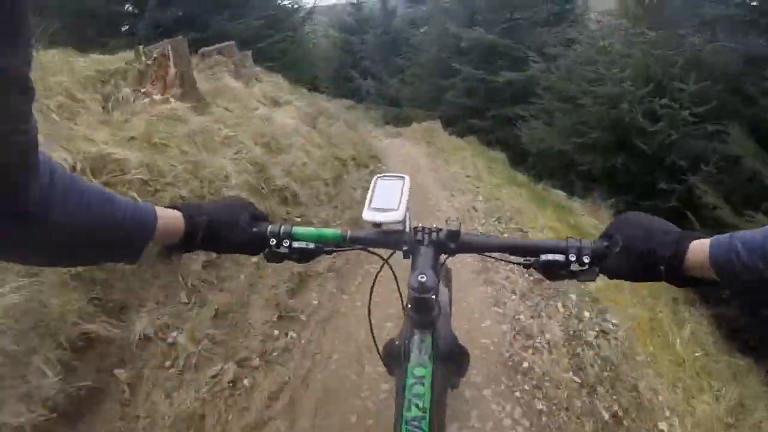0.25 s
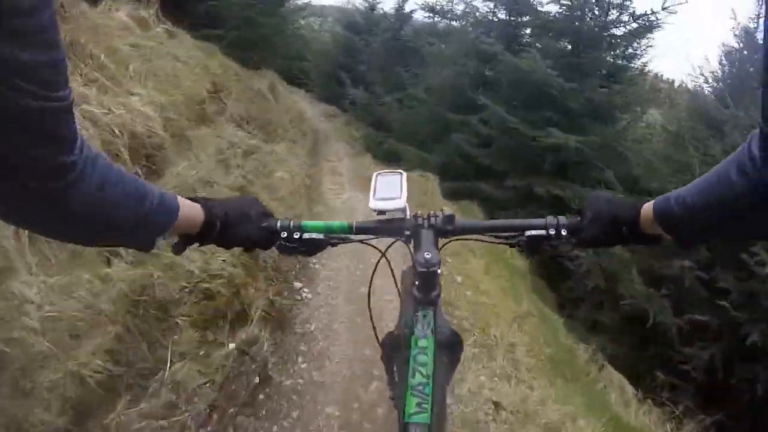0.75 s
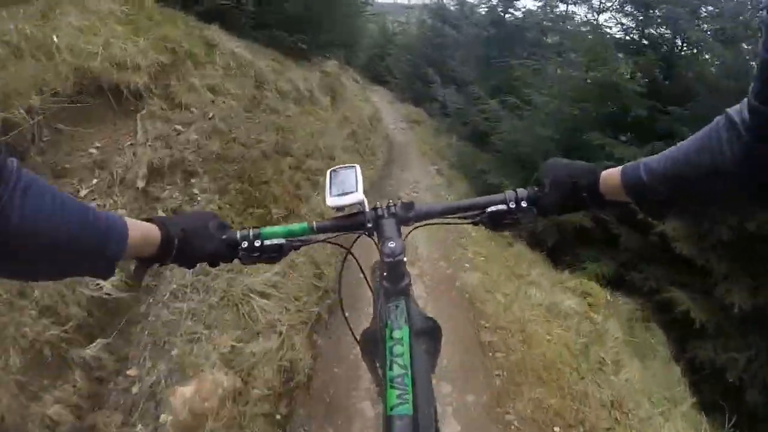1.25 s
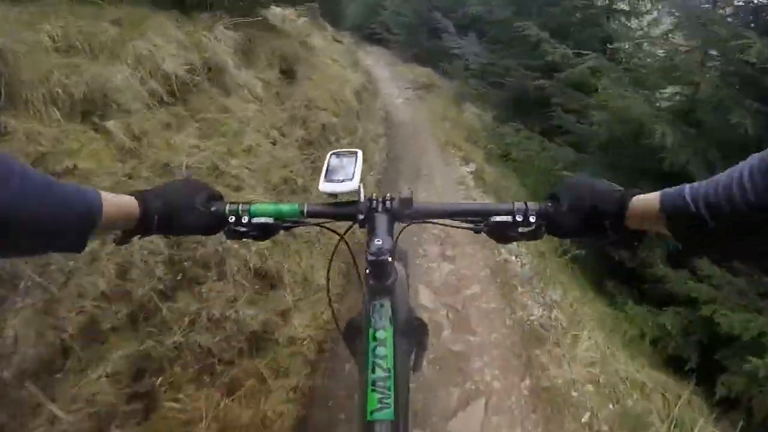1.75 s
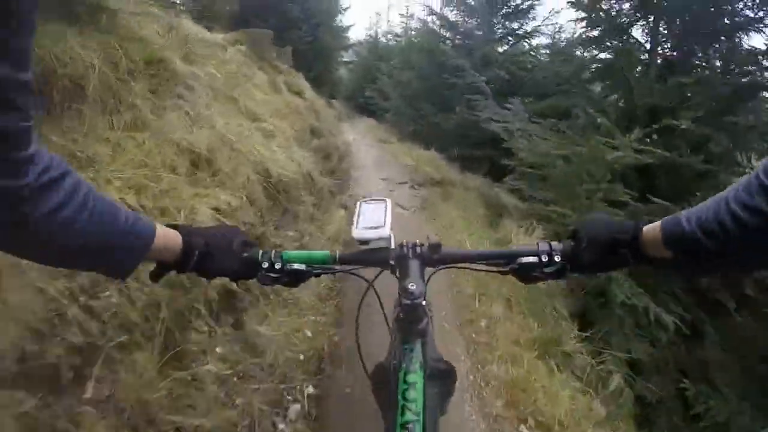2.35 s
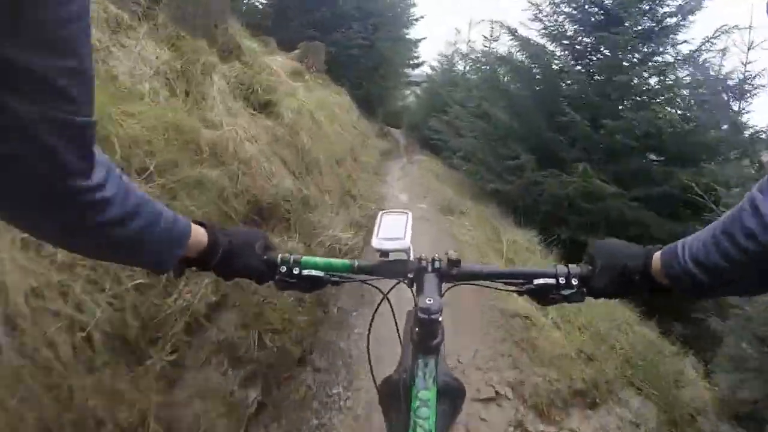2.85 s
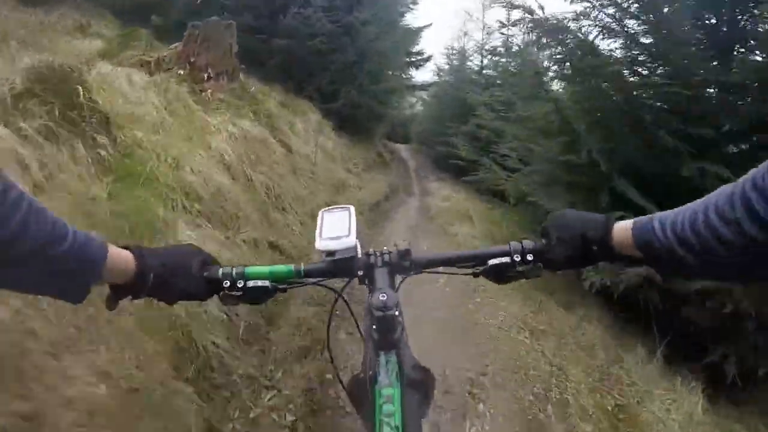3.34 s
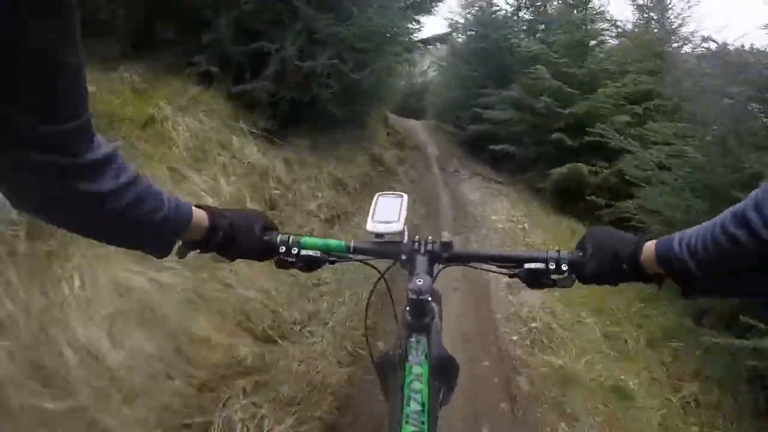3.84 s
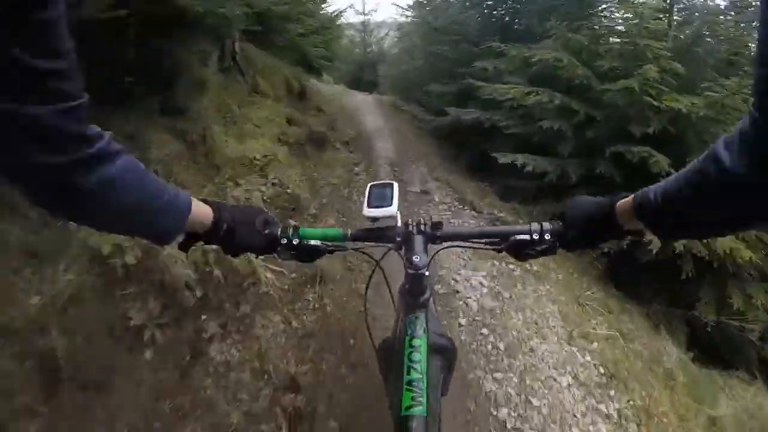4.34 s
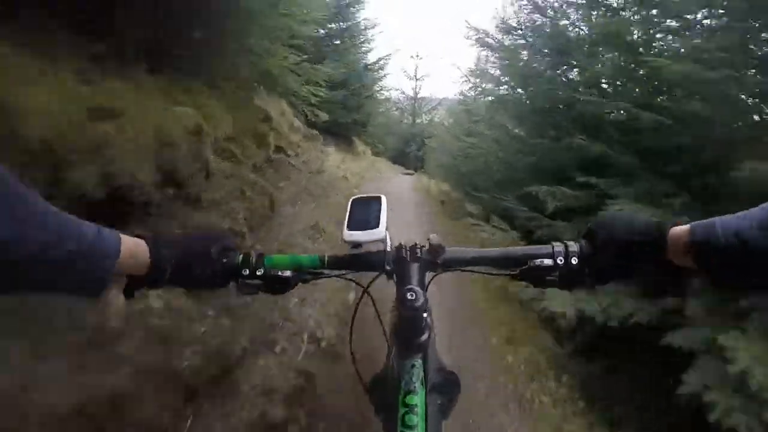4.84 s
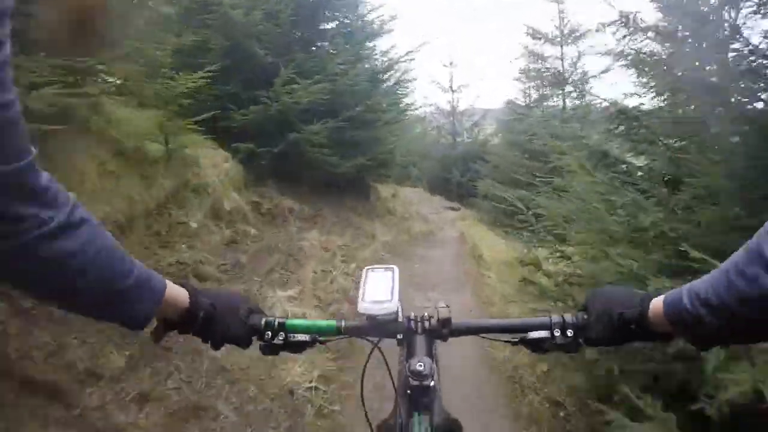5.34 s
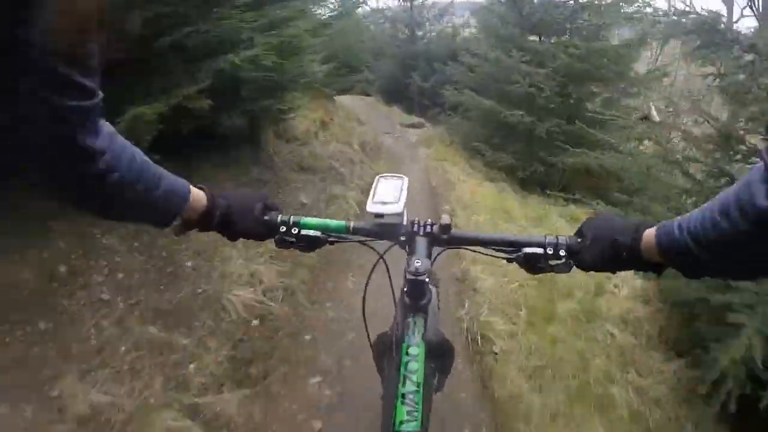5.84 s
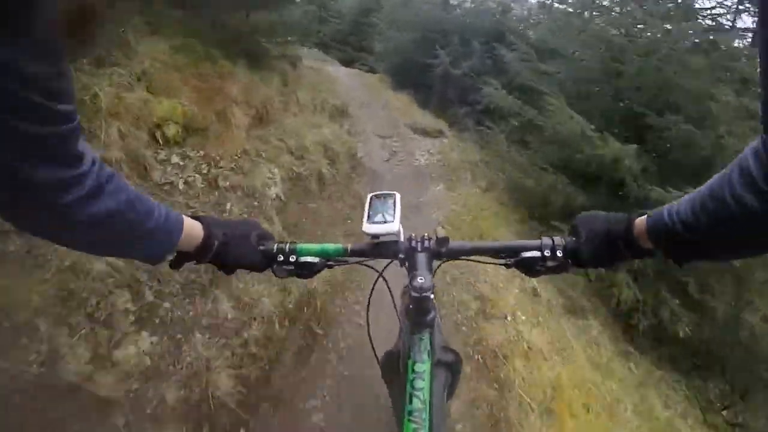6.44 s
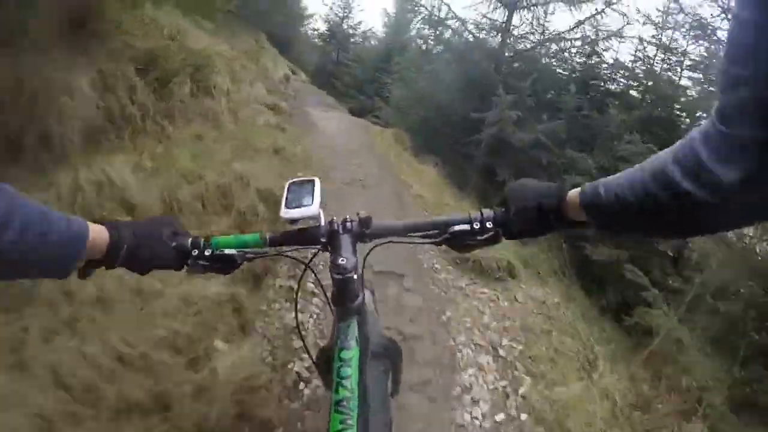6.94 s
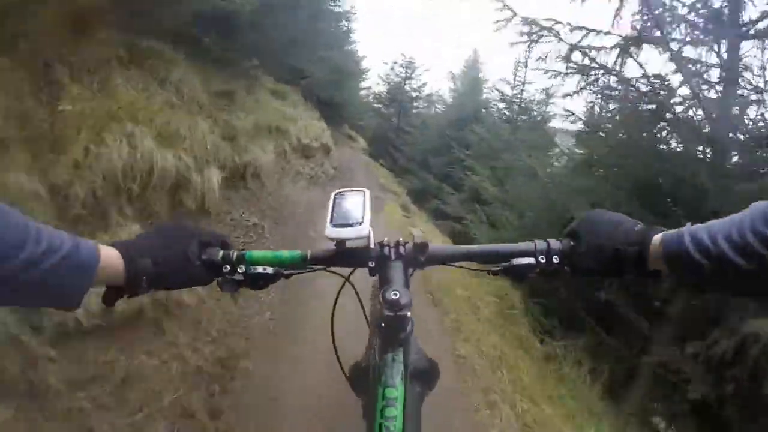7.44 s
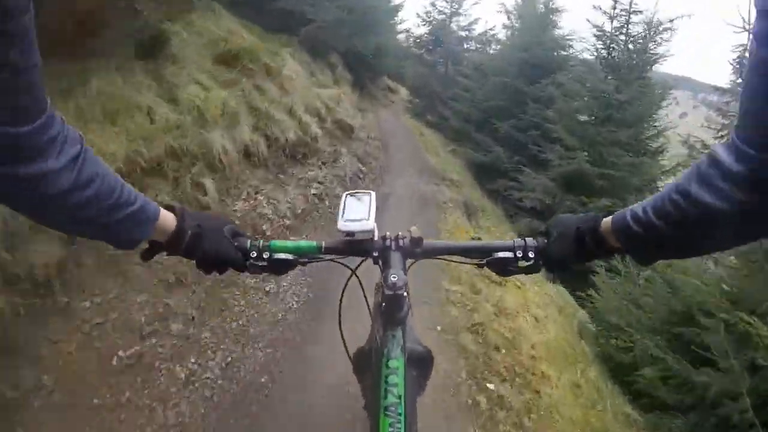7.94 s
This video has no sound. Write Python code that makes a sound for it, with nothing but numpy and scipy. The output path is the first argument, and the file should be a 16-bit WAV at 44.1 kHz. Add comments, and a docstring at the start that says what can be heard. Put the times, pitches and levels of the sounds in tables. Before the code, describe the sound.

A bicycle descends a stony forest path, heard by a microphone enclosed in a hard shell on the rider's chest. Loose parts click and clatter irregularly over low rumble and faint gravel crunch. Deep thumps crowd together around two seconds, return near four and a half, and one big jolt lands just after seven. Brief gritty tyre skids scratch around three seconds. Everything is close, muffled and boxy.

```python
"""Stony trail by bicycle, heard inside a shell

A bicycle runs down a stony trail, heard by a microphone shut in a hard shell on the rider's chest.
Filtered noise makes wind, shake, air and gravel; damped swings make the jolts that thump the shell.
Impulses and noise make loose parts rattle, soft blows make dull knocks, dense grit makes tyre skids.
Rattles, gravel and skids ring the shell's resonances; gravel and knocks also ring a cavity.
"""
import sys
import numpy as np
from scipy import signal
from scipy.fft import rfft, irfft
from scipy.io import wavfile

SR = 44100
rng = np.random.default_rng(int(sys.argv[2]) if len(sys.argv) > 2 else 0)


def waveform_to_disk(signal):
    """Save audio, clipped to [-1, 1], as 16-bit WAV at the path in sys.argv[1]."""
    frames = np.transpose(np.atleast_2d(signal))
    scaled = np.clip(frames, -1, 1) * 32767
    samples = np.round(scaled).astype(np.int16)
    wavfile.write(sys.argv[1], SR, samples)


N = 361179  # samples


def amp(db):
    """Decibel law: 20 dB is a factor of ten in amplitude."""
    return 10 ** (np.asarray(db) / 20)


def evened(x):
    """Normalisation to a root-mean-square level of 1."""
    return x / np.sqrt(np.mean(x ** 2) + 1e-20)


def add(mix, s, sound):
    """Superposition: add a sound to the mix from s seconds on."""
    part = mix[max(round(s * SR), 0):][:len(sound)]
    part += sound[:len(part)]


def soften(x, hz):
    """Contact compliance: a softer contact gives the same blows with less treble."""
    low_pass = signal.butter(2, min(hz, SR / 2.5), fs=SR, output="sos")
    return signal.sosfilt(low_pass, x)


def ring(x, hz, width_hz):
    """Damped resonance: a pole pair with a gain of about 1 at its centre."""
    r = np.exp(-np.pi * width_hz / SR)
    return signal.lfilter([1 - r, 0, r - 1], [1, -2 * r * np.cos(2 * np.pi * hz / SR), r * r], x)


def shell(x, modes):
    """Modal superposition: resonances of alternating sign, scaled so that white noise keeps its level."""
    tick = np.eye(1, 2048)[0]
    answer = np.zeros(len(tick))
    for k, (hz, width_hz, db) in enumerate(modes):
        answer += (-1) ** k * amp(db) * ring(tick, hz, width_hz)
    return signal.oaconvolve(x, answer / np.linalg.norm(answer))[:N]


def coloured(spectrum):
    """Spectral shaping: white noise weighted along log frequency, at level 1."""
    hz, db = np.transpose(spectrum)
    f = np.fft.rfftfreq(N, 1 / SR)
    weight = amp(np.interp(np.log(f + 1), np.log(hz), db))
    return evened(irfft(rfft(rng.standard_normal(N)) * weight, N))


def lumps(cutoff_hz, depth_db):
    """Amplitude modulation: a gain of level 1 that wanders at random below the cutoff."""
    low_pass = signal.butter(2, cutoff_hz, fs=SR, output="sos")
    slow = signal.sosfilt(low_pass, rng.standard_normal(N))
    return evened(amp(depth_db * evened(slow)))


def grit(per_s, spread_db):
    """Random impulse train: sparse ticks of random sign, a few of them large, at level 1."""
    size = amp(spread_db * np.minimum(rng.exponential(1, N), 4))
    sign = rng.choice([-1., 1.], N)
    return evened(size * sign * (rng.random(N) < per_s / SR))


# Course of the ride. Each row: time in seconds, relative levels of wind, gravel crunch and
# gravel hiss in dB.
RIDE = [(0.0, -38.5, -54.5, -72), (0.26, -38, -57.5, -75), (0.46, -32.5, -47, -66), (0.7, -42, -54, -72),
        (1.2, -38.5, -52.5, -72), (1.6, -34, -52.5, -70), (2.2, -25.5, -42, -62), (2.5, -42, -57.5, -90),
        (2.85, -42, -55, -85), (3.1, -31.5, -47, -63), (3.4, -39, -51.5, -72), (3.75, -34, -51, -65),
        (4.3, -40, -52.5, -76), (4.62, -31, -47, -77), (4.85, -37, -51.5, -87), (5.5, -42, -57, -95),
        (6.0, -37.5, -55.5, -67), (6.6, -38.5, -50.5, -91), (7.16, -26.5, -48.5, -81), (7.4, -34, -46, -78),
        (8.19, -48, -66.5, -83)]


def ride_db(axis):
    """Linear interpolation in decibels: one column of the ride at every sample."""
    rows = np.transpose(RIDE)
    return np.interp(np.arange(N) / SR, rows[0], rows[axis])


# Spectra of wind, frame shake and air. Each row: frequency in Hz, relative spectral level in dB.
WIND_SPECTRUM = [(6, -32), (12, 5.5), (36, -13), (70, -22), (150, -25), (400, -82), (3000, -130)]
SHAKE_SPECTRUM = [(40, -43), (100, 3), (250, -2.5), (570, -11), (1000, -31), (1400, -3), (3000, -52),
                  (9500, -61), (12500, -95)]
AIR_SPECTRUM = [(600, 17.5), (1500, 9.5), (3200, -29), (3650, -39), (4100, -16), (4600, -37), (6000, -8),
                (9000, -3), (12500, -31), (16000, -60)]
AIR_DB = -62
WIND_REF_DB = -38
SHAKE_DB, SHAKE_PER_DB = -49.5, 0.92  # shake level at the wind reference, dB per dB of wind


def rumble():
    """Modulated noise: wind buffets the shell, the frame shakes in lumps, a faint rush of air is steady."""
    wind_db = ride_db(axis=1)
    wind = coloured(WIND_SPECTRUM) * lumps(4.7, 1.2) * amp(wind_db)
    shake_db = SHAKE_DB + SHAKE_PER_DB * (wind_db - WIND_REF_DB)
    shake = coloured(SHAKE_SPECTRUM) * lumps(21.4, 6.64) * amp(shake_db)
    air = amp(AIR_DB) * coloured(AIR_SPECTRUM)
    return wind + shake + air


# Cavity resonance: frequency in Hz, width in Hz under gravel.
CAVITY = (1560, 91)
# Shell resonances, middle and treble. Each row: frequency in Hz, width in Hz, relative level in dB.
SHELL_MIDDLE = [(1400, 880, 2.5), (2165, 263, 11.5), (2543, 208, 11), (3134, 217, 11), (4000, 75, -3)]
SHELL_TREBLE = [(4100, 360, 3), (5805, 605, 5), (7870, 1050, -1), (9420, 920, -5), (12900, 1100, -21),
                (6950, 2200, -17.5)]
CRUNCH_REF_DB = -54
DRONE_DB, DRONE_PER_DB = -52.5, 0.42  # drone level at the crunch reference, dB per dB of crunch


def gravel():
    """Random excitation: clumped grit under the tyres drives cavity and shell; finer grit hisses."""
    crunch_db = ride_db(axis=2)
    drive = lumps(40, 3.0) * (.6 * grit(2500, 3.5) + .7 * rng.standard_normal(N))
    roll = .5 * drive + .8 * rng.standard_normal(N) * lumps(40, 2.0)
    drone_gain = amp(DRONE_DB + DRONE_PER_DB * (crunch_db - CRUNCH_REF_DB))
    drone = evened(ring(roll, *CAVITY)) * drone_gain
    crunch = shell(evened(soften(drive, 1980)) * amp(crunch_db - 7.5), SHELL_MIDDLE)
    fine = lumps(25, 2.5) * amp(ride_db(axis=3)) * grit(5000, 2.5)
    hiss = soften(shell(fine, SHELL_TREBLE), 10500)
    return drone + crunch + hiss


# Jolts. Each row: start in seconds, relative level in dB, settled pitch in Hz,
# direction (+1 push, -1 pull).
JOLTS = [(0.126, -29.5, 65, 1), (0.269, -32, 151, -1), (0.4063, -30, 54, 1), (0.4508, -32, 100, -1),
         (1.2387, -26.5, 126, -1), (1.253, -26, 130, 1), (1.2796, -25.5, 133, 1), (1.43, -20.5, 93, 1),
         (1.571, -21.5, 101, -1), (1.629, -28, 66, -1), (1.6388, -11, 111, 1), (1.6472, -25, 55, -1),
         (1.7926, -13, 78.4, 1), (1.8234, -26.5, 105, -1), (1.9162, -10, 96, 1), (1.9313, -12.5, 150, -1),
         (1.9476, -16.5, 95, 1), (2.0512, -17.5, 170, -1), (2.06, -5.5, 130, 1), (2.1943, -7.5, 101, 1),
         (2.208, -23, 45, 1), (2.33, -6, 137, 1), (2.5668, -32.5, 126, 1), (4.057, -31, 115, 1),
         (4.5, -21, 59.6, -1), (4.522, -18, 124, 1), (4.5872, -15, 75.4, 1), (4.735, -25, 153, -1),
         (4.7594, -6, 121, 1), (5.051, -29, 123, 1), (5.059, -26.5, 44, -1), (5.0786, -30.5, 111, 1),
         (5.8236, -33.5, 95, 1), (5.8782, -34, 78, 1), (5.95, -29.5, 42.2, -1), (6.016, -33, 44.7, 1),
         (6.0497, -28.5, 175, 1), (6.1917, -27.5, 155, -1), (6.1971, -23, 81, 1), (6.339, -25, 117, -1),
         (6.7502, -21.5, 77, 1), (6.8501, -23.5, 102, -1), (7.2436, -5, 116, 1), (7.69, -30.5, 142, 1),
         (7.8601, -34, 94, 1)]


def jolts():
    """Transient oscillation: a quick swing and a slower one back; the mount shudders on for a moment."""
    out, after = np.zeros(N), np.zeros(N)
    for s, db, hz, way in JOLTS:
        turns = hz * np.arange(int(2.2 * SR / hz)) / SR  # cycles at the settled pitch
        phase = turns + 0.11 * (1 - np.exp(-turns / 0.13))  # runs ahead at first
        envelope = (turns / 0.24 * np.exp(1 - turns / 0.31)) ** 2.14
        add(out, s, np.sign(way) * amp(db) * envelope * np.sin(2 * np.pi * phase))
        t = np.arange(4000) / SR / 0.0062  # in units of 6.2 ms
        add(after, s, amp(db) * t * np.exp(-t))
    shudder = after * evened(ring(rng.standard_normal(N), 190, 112))
    return out + amp(-19.0) * shudder


# Rattles of loose parts. Each row: start in seconds, relative level in dB, contact length in ms,
# relative treble against middle in dB.
RATTLES = [(0.1381, -34.5, 2.4, -10), (0.146, -23, 1.7, -6), (0.2304, -32, 3.7, -0.5),
           (0.3283, -26, 1.6, -8.5), (0.356, -26.5, 3.3, -1), (0.439, -38, 1.8, -25),
           (0.472, -35, 5.8, -4.5), (0.6342, -34.5, 1.7, -8), (0.641, -34.5, 2, -7),
           (0.6748, -34.5, 1.7, -5.5), (0.575, -46.5, 8.8, -0.5), (0.852, -39.5, 1.1, -13),
           (0.9106, -30, 3.2, -3.5), (1.119, -27, 1.35, -7.5), (1.17, -31.5, 3.7, -2.5),
           (1.28, -26.5, 2.2, -42), (1.3011, -22, 1.5, -7), (1.375, -27.5, 7.2, -3.5),
           (1.5098, -22.5, 1.55, -8.5), (1.577, -29, 3.4, 2.5), (1.637, -19, 2.9, -59),
           (1.6711, -23, 1.5, -7), (1.7, -33, 1.1, -31), (1.721, -26.5, 4.1, -7.5), (1.8, -25, 1.63, 0),
           (1.8602, -27.5, 2, 0), (1.9138, -32.5, 4.4, 0), (1.9333, -32.5, 6.2, -5),
           (1.9505, -17.5, 1.6, -15), (1.96, -35, 5.1, -1), (1.9936, -29.5, 3, -1.5),
           (2.0516, -35, 5.7, -3), (2.063, -30, 1.1, -3.5), (2.0818, -32.5, 2.7, -3),
           (2.1235, -36, 1.7, 9.5), (2.1476, -13.5, 1.6, -45), (2.1984, -38.5, 0.76, 1.5),
           (2.204, -31.5, 2.3, 0), (2.2301, -25, 0.67, -21), (2.277, -20.5, 1.1, -37), (2.287, -29, 2, 4.5),
           (2.3321, -25.5, 1.2, -15), (2.3417, -37.5, 8.2, 0.5), (2.4238, -38.5, 2.8, -10),
           (2.4705, -38, 2.6, -9.5), (2.5574, -39.5, 4.9, -4.5), (2.5685, -35.5, 2.8, -40),
           (2.701, -40, 1.6, -8), (2.761, -41, 3.3, -6.5), (2.8881, -40, 2, -8.5), (2.9438, -34, 7.8, -14),
           (2.9592, -27.5, 1.5, -19), (2.9953, -35.5, 2, -6), (3.076, -20, 2, -8.5), (3.13, -26, 3.2, -0.5),
           (3.278, -34.5, 1.6, -12), (3.313, -31, 5.6, -1), (3.4081, -29.5, 1.3, -9),
           (3.4427, -32, 4.5, -2.5), (3.5284, -28, 7.8, -12), (3.545, -32.5, 9.6, -20), (3.595, -30, 3, -2),
           (3.6978, -30.5, 2.1, -2.5), (3.7043, -21.5, 1.9, -7), (3.7229, -37, 4.5, -7),
           (3.7315, -29, 2.8, -13), (3.7578, -38, 12, -30), (3.772, -26.5, 5, -3), (3.8793, -33.5, 1.9, -9),
           (3.9651, -34, 9.5, -8.5), (4.0735, -24, 1.7, -8.5), (4.1743, -31.5, 1.4, -12.5),
           (4.2066, -37.5, 5.2, -5), (4.216, -40.5, 1.4, 3.5), (4.464, -32.5, 2.8, -11),
           (4.4684, -28, 1.1, -5.5), (4.4893, -34, 2, -10), (4.5237, -16.5, 2.5, -11.5),
           (4.589, -34, 2.8, -11), (4.6054, -14.5, 2.4, -7), (4.635, -51, 1.2, 7), (4.6741, -33, 2.1, -7),
           (4.6823, -30, 3.2, -2.5), (4.6965, -34, 1.2, -11), (4.7637, -27, 2.7, -6),
           (4.829, -32, 4.5, -3.5), (4.867, -46.5, 5.9, -2.5), (4.911, -47, 1.7, 0),
           (4.921, -32.5, 1.2, -29), (4.974, -31.5, 1.9, -13), (4.9997, -33.5, 2.1, -5.5),
           (5.0665, -24, 1.37, -11), (5.134, -29.5, 1.8, -9.5), (5.148, -39, 4.4, -8),
           (5.234, -35.5, 2.4, -10), (5.245, -36.5, 0.58, -14.5), (5.365, -33, 3.9, -5),
           (5.4121, -30.5, 2, -12), (5.535, -33.5, 2.2, -3), (5.6045, -26.5, 1.44, -7),
           (5.775, -31.5, 2.9, -3.5), (5.8785, -31, 2, -12), (5.9672, -29, 4.4, -2.5),
           (6.0704, -25.5, 1.2, -6), (6.08, -33, 1.5, -13), (6.135, -38, 1.7, -9),
           (6.1657, -25.5, 4.6, -4.5), (6.2916, -40.5, 2.6, -4), (6.313, -40, 2, -5), (6.33, -34, 1.5, -15),
           (6.3985, -27, 3.2, -3), (6.5235, -35.5, 1.3, -3), (6.5297, -26.5, 1.7, -5.5),
           (6.6057, -28.5, 2.8, -2), (6.7643, -38.5, 11, -8.5), (6.8335, -28.5, 3.8, 1.5),
           (6.9168, -26, 1.3, -8), (7.0139, -28, 4, -4), (7.097, -34, 2, -37), (7.1449, -18.5, 2, -9),
           (7.1504, -23, 2.6, -9), (7.1745, -35, 4.5, -5), (7.1887, -24, 3.2, -2.5), (7.2107, -29, 2, -28),
           (7.2476, -22, 3.2, -5), (7.2968, -36.5, 3.1, -3), (7.3202, -25.5, 1.2, -33),
           (7.3824, -27.5, 2.2, -6), (7.445, -30, 3.7, -0.5), (7.5784, -27, 1.6, -8.5),
           (7.6089, -30, 1.3, -8), (7.6344, -34, 2.1, -5.5), (7.69, -29.5, 1.9, -60), (7.7571, -34, 3.8, 0),
           (7.927, -31, 1.7, -11), (8.02, -39.5, 2.2, -10.5)]
# faint rattles at random moments: level above the gravel crunch, spread either way, mean length and treble
FAINT_PER_S, FAINT_DB, FAINT_SPREAD_DB, FAINT_MS, FAINT_TREBLE_DB = 6, 8, 1.5, 8.1, -11
# bounce: delay and its scatter, level change, further change per ms of contact, length, treble change
BOUNCE_MS, BOUNCE_SCATTER_MS, BOUNCE_DB, BOUNCE_DB_PER_MS = 7.5, 0.9, -3.5, -2.5
BOUNCE_LENGTH_MS, BOUNCE_DULL_DB = 1.5, -7.5


def all_rattles():
    """Rebound: listed and faint random rattles each bounce once, duller, strongest for short contacts."""
    u = rng.random((round(FAINT_PER_S * N / SR), 4))
    at = u[:, 0] * (N - 1)
    faint_db = ride_db(axis=2)[at.astype(int)] + FAINT_DB + FAINT_SPREAD_DB * (2 * u[:, 1] - 1)
    faint = np.c_[at / SR, faint_db, FAINT_MS * (.5 + u[:, 2]), 2 * FAINT_TREBLE_DB * u[:, 3]]
    s, db, ms, treble_db = np.r_[faint, RATTLES].T
    late_ms = BOUNCE_MS + BOUNCE_SCATTER_MS * rng.uniform(-1, 1, len(s))
    bounce_db = db + BOUNCE_DB + BOUNCE_DB_PER_MS * ms
    bounce_length = np.full(len(s), BOUNCE_LENGTH_MS)
    bounces = np.c_[s + late_ms / 1000, bounce_db, bounce_length, treble_db + BOUNCE_DULL_DB]
    return np.r_[np.c_[s, db, ms, treble_db], bounces]


def rattles():
    """Impact excitation: a clean blow, chatter for the length of the contact, then a weak shiver."""
    middle, treble, blows = np.zeros(N), np.zeros(N), np.zeros(N)
    ms = np.arange(-300, 1300) / SR * 1000
    rows = all_rattles()
    shape = (len(rows), len(ms))
    chatter = 0.63 * rng.standard_normal(shape) + 0.58 * np.resize(grit(1500, 0.49), shape)
    for (s, db, length, treble_db), noise in zip(rows, chatter):
        length = max(length, .3)
        start = s + ms[0] / 1000
        contact = np.exp(-(abs(ms - 0.33 * length) / (0.99 * length)) ** 1.23)
        shiver = 0.33 * (ms > 0) * np.exp(-abs(ms) / 8)
        # short, hard contacts are mostly one blow
        blow = 16.34 / length * amp(0.032 * (db + 3)) * (ms == 0)
        drive = blow + noise * (contact + shiver)
        add(middle, start, amp(db) * soften(drive, 2000 + 5000 * amp(.5 * treble_db)))
        add(treble, start, amp(db + treble_db) * (drive - 0.076 * blow))
        add(blows, start, amp(db + .5 * treble_db) * blow)
    push = amp(13.0) * soften(blows, 1050)  # each blow also pushes the microphone directly
    ringing = shell(middle, SHELL_MIDDLE) + amp(-1.5) * shell(treble, SHELL_TREBLE)
    return amp(-4.0) * (ringing + push)


# Dull knocks that ring the cavity alone. Each row: start in seconds, relative level in dB.
KNOCKS = [(0.2894, -36), (0.4385, -31.5), (0.4942, -27.5), (0.5903, -34), (0.7553, -40), (0.845, -34),
          (1.399, -44), (1.8684, -37), (1.92, -35.5), (2.058, -39), (2.0923, -35.5), (2.179, -34.5),
          (2.4785, -35.5), (2.499, -39), (2.583, -39.5), (2.649, -40), (2.939, -33.5), (2.969, -37),
          (3.0497, -39), (3.124, -29), (3.218, -39.5), (3.5544, -40), (4.022, -42), (4.586, -35),
          (4.6459, -37.5), (6.7636, -34.5), (7.1256, -35), (7.1654, -40), (7.452, -30.5)]


def knocks():
    """Resonance at the driving pitch: a soft blow about a millisecond long sets the cavity ringing."""
    blows = np.zeros(N)
    t = np.arange(60) / SR
    blow = np.sin(2 * np.pi * CAVITY[0] * t) * np.hanning(len(t))
    for s, db in KNOCKS:
        add(blows, s, amp(db) * blow)
    return amp(23.0) * ring(blows, CAVITY[0], 76) + amp(7.0) * blows


# Short skids of the tyre on loose grit. Each row: start in seconds, length in seconds, relative level in dB.
SKIDS = [(2.907, 0.062, -52.5), (3.027, 0.023, -56), (3.067, .075, -51.5), (3.201, 0.036, -57.5),
         (3.506, 0.034, -57), (3.296, 0.043, -66), (3.708, 0.038, -61), (4.704, 0.037, -65)]
# Scrape spectrum. Each row: frequency in Hz, relative spectral level in dB.
SCRAPE_SPECTRUM = [(2500, -18), (4000, 11.5), (6000, -3), (9500, 7), (12500, -5), (14800, -9), (15800, -30)]
SKID_RISE_S, SKID_FALL_S, SKID_MIDDLE_DB = 0.0027, 0.008, 11.5


def skids():
    """Sliding friction: bursts of dense grit start fast, let go quickly, scrape and ring the shell."""
    t, gate = np.arange(N) / SR, np.zeros(N)
    for s, length, db in SKIDS:
        rise = np.clip((t - s) / SKID_RISE_S, 0, 1)
        fall = np.exp(-np.maximum(t - s - length, 0) / SKID_FALL_S)
        gate += amp(db) * rise * fall
    grains = gate * lumps(60, 2.0) * grit(6000, 2.5)
    ringing = shell(grains, SHELL_TREBLE) + amp(SKID_MIDDLE_DB) * shell(grains, SHELL_MIDDLE)
    scrape = amp(-1.0) * gate * coloured(SCRAPE_SPECTRUM)
    return ringing + scrape


def scene():
    """Linear superposition of all sources in one channel."""
    return (rumble() + gravel() + jolts() + rattles() + knocks() + skids())[None]


MIC_HZ, EDGE_HZ = 14500, 15900


def record(dry):
    """Low-pass filtering: the microphone loses the top treble; then the band limit."""
    mic = signal.butter(10, MIC_HZ, fs=SR, output="sos")
    dull = signal.sosfilt(mic, dry)
    band_limit = signal.firwin(511, EDGE_HZ, window=("kaiser", 9), fs=SR)
    return signal.oaconvolve(dull, band_limit[None], "same")


dry = scene()
out = record(dry)
waveform_to_disk(out)
```